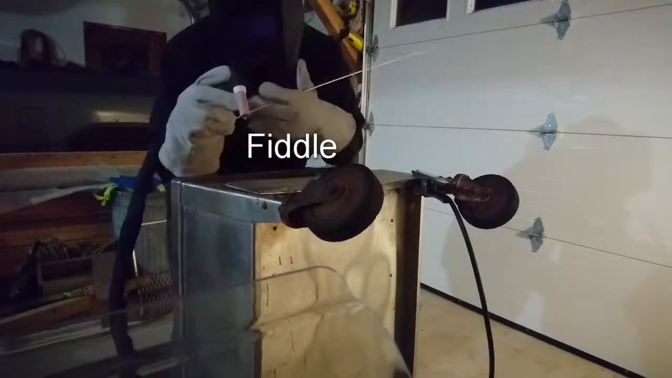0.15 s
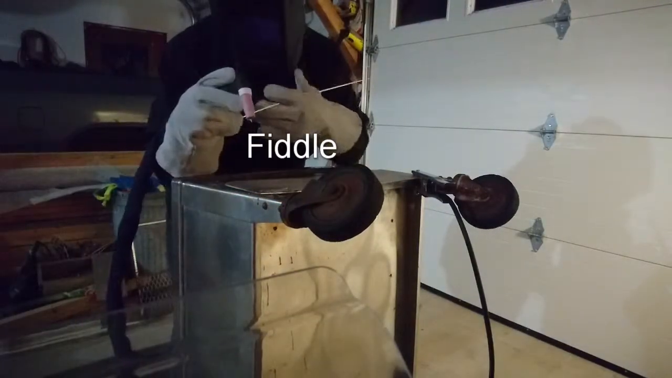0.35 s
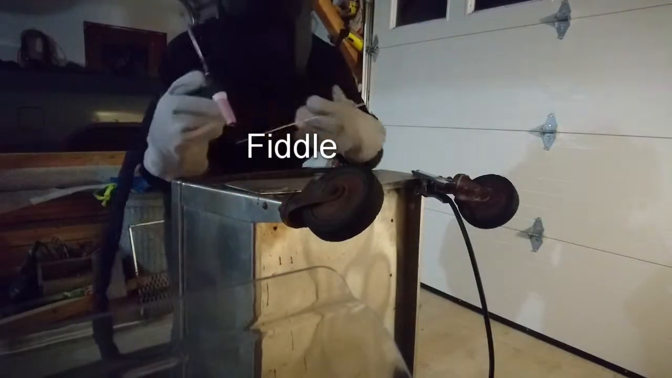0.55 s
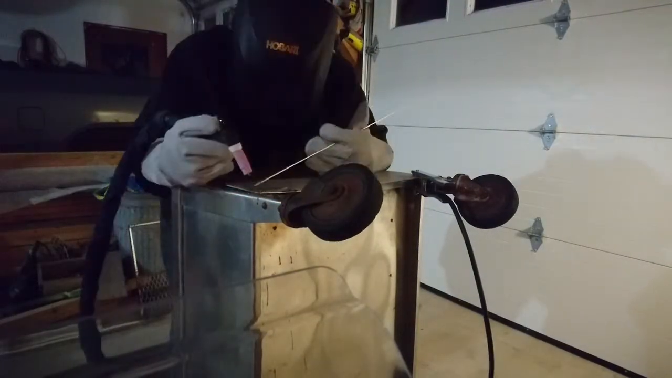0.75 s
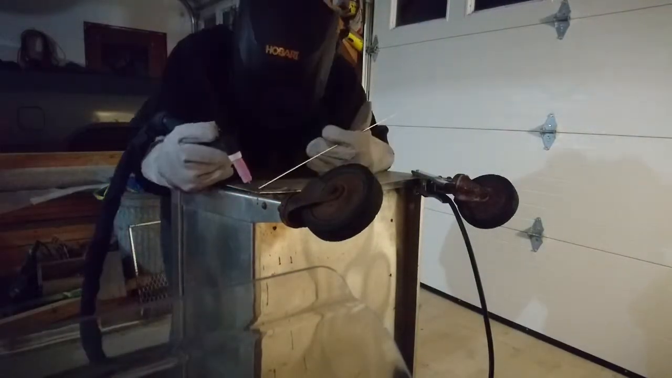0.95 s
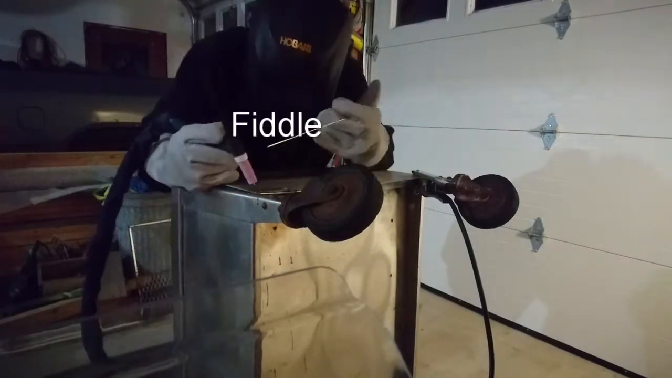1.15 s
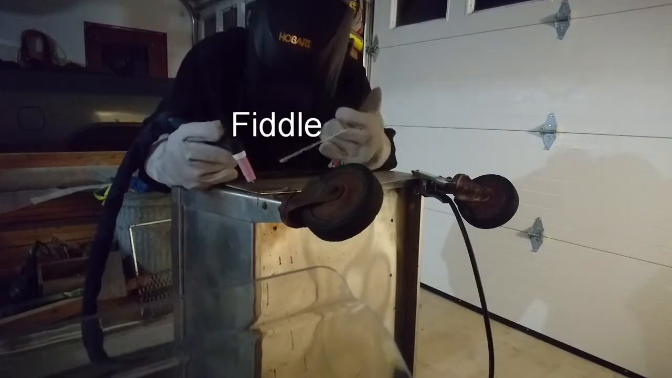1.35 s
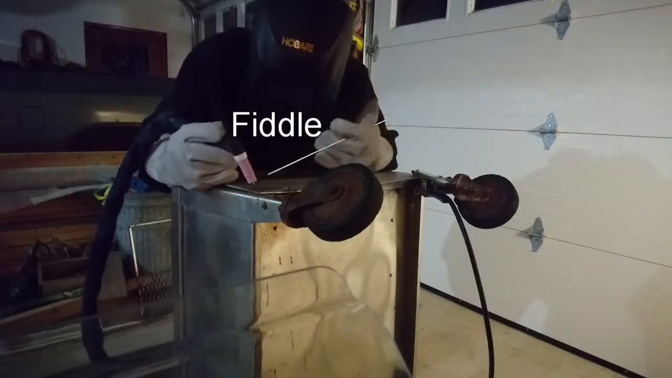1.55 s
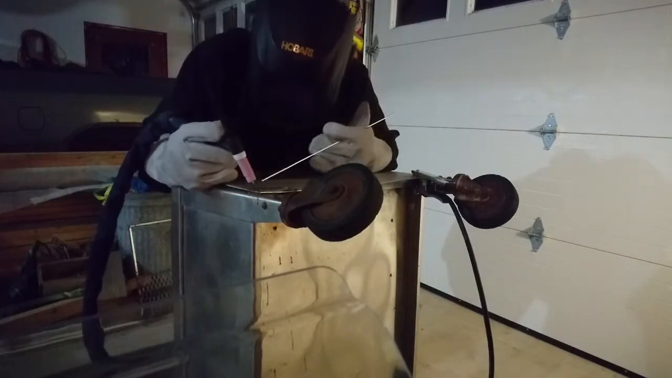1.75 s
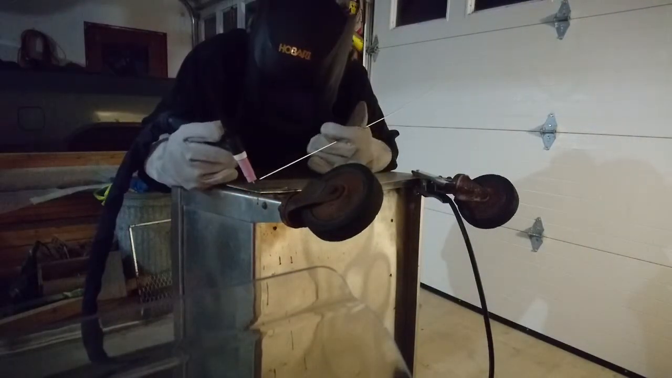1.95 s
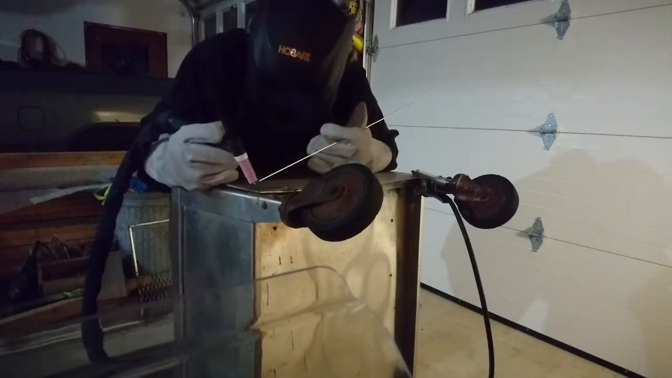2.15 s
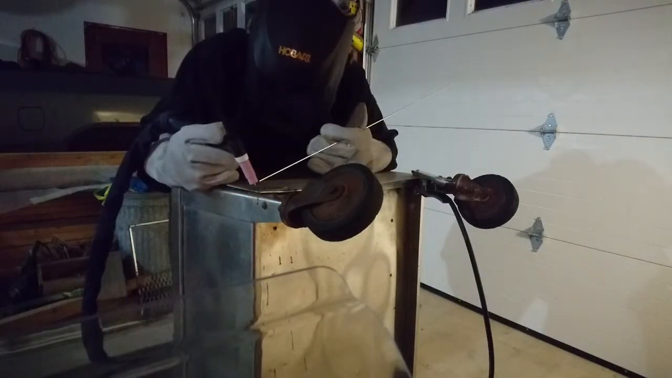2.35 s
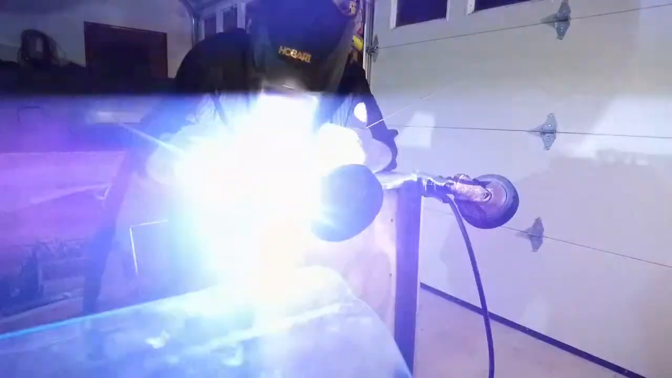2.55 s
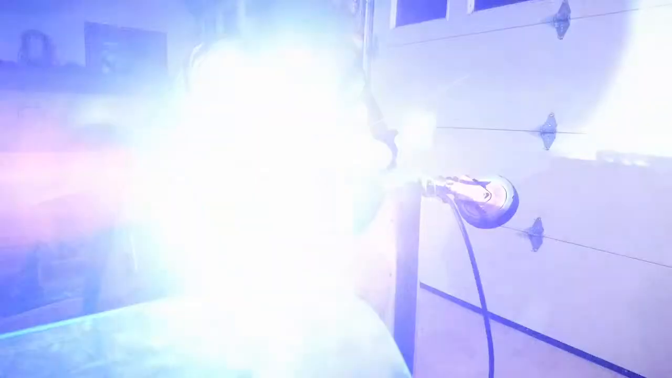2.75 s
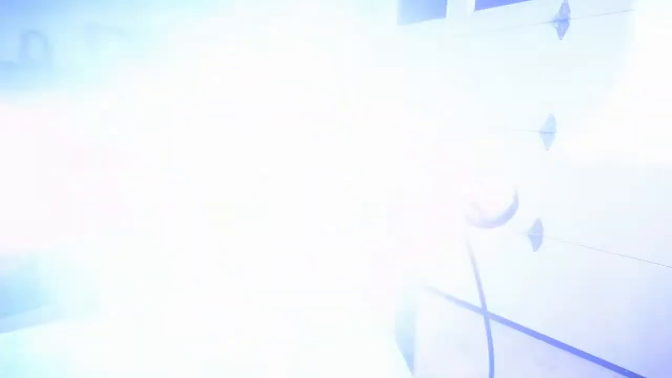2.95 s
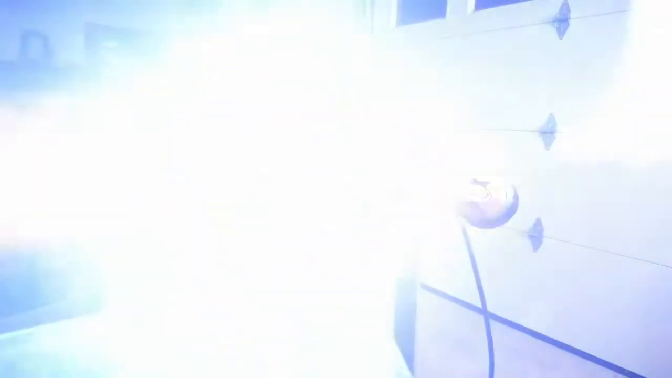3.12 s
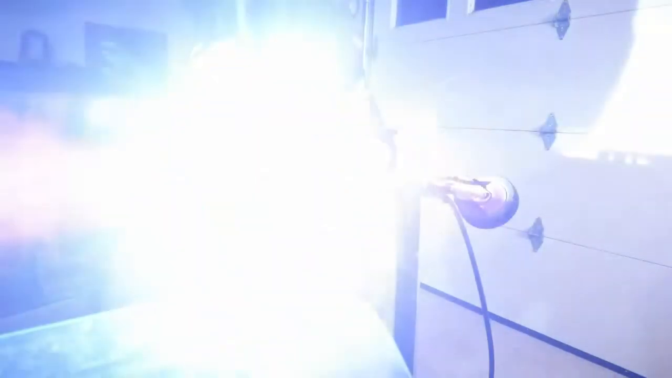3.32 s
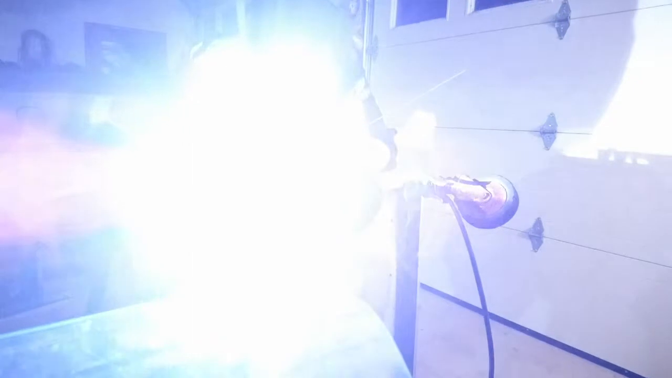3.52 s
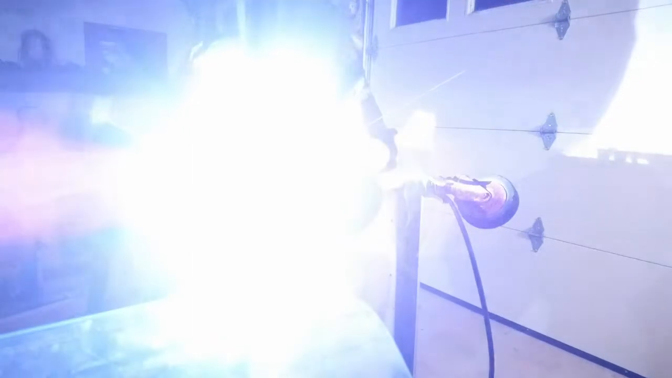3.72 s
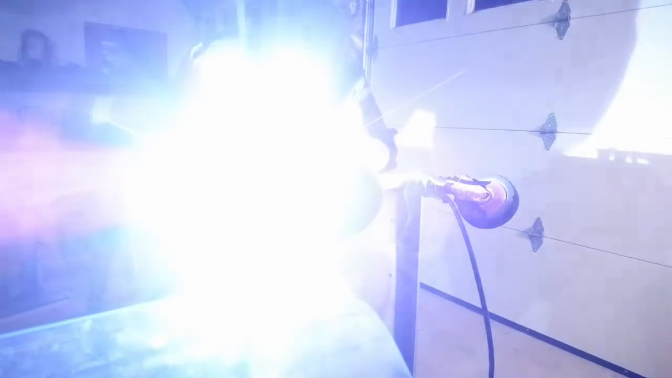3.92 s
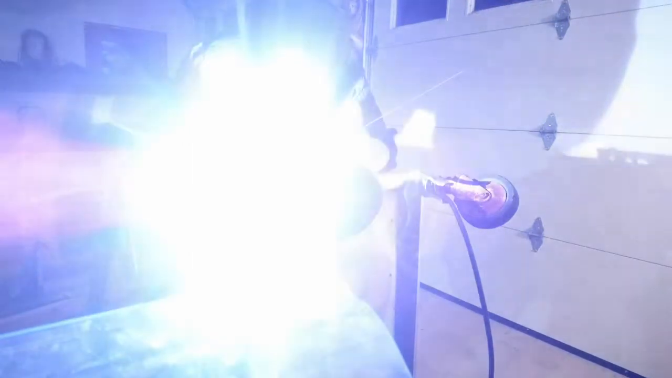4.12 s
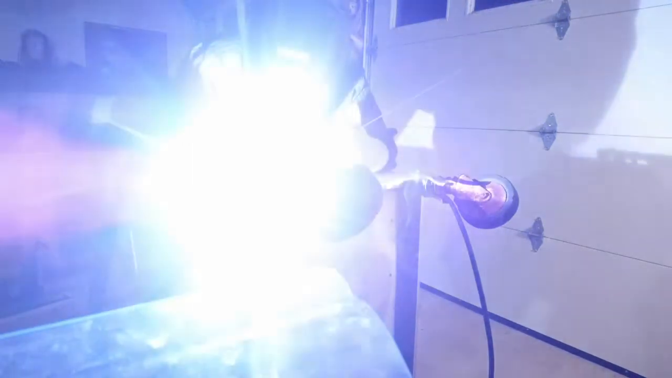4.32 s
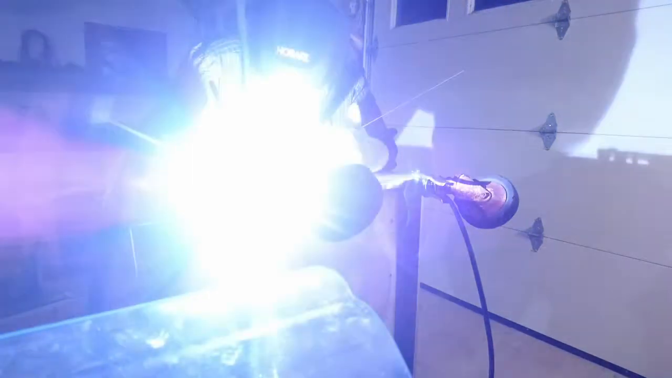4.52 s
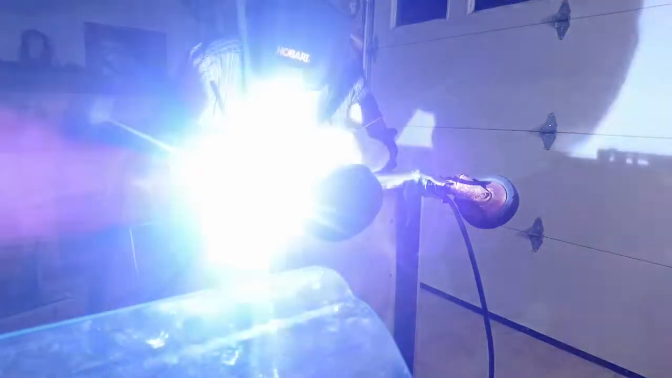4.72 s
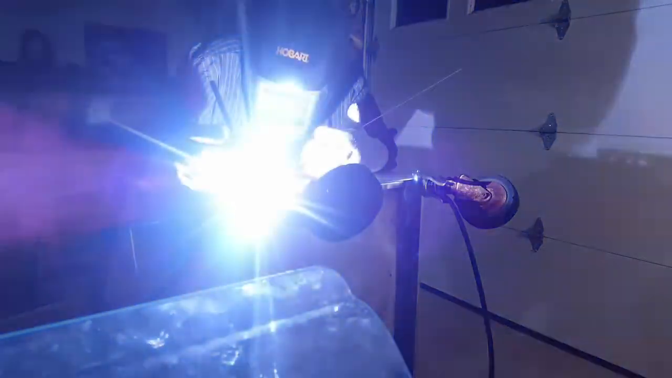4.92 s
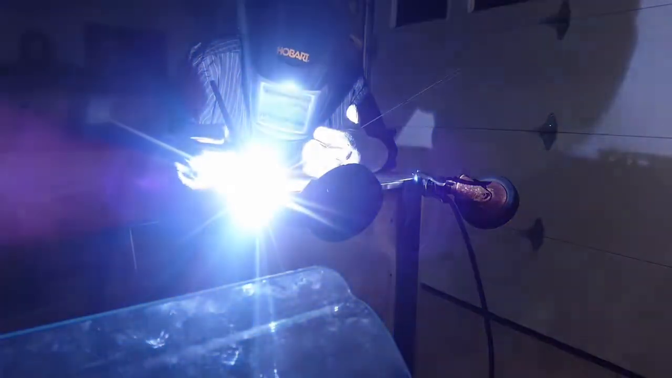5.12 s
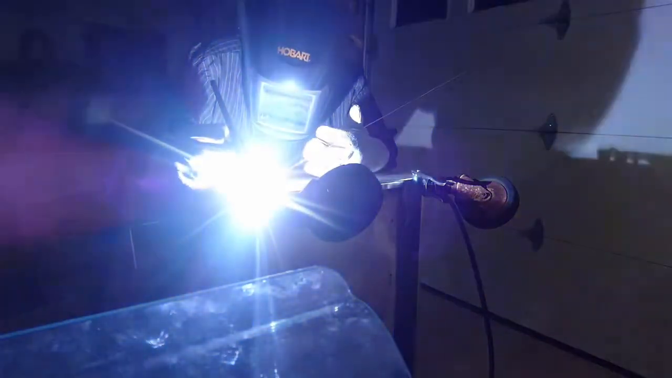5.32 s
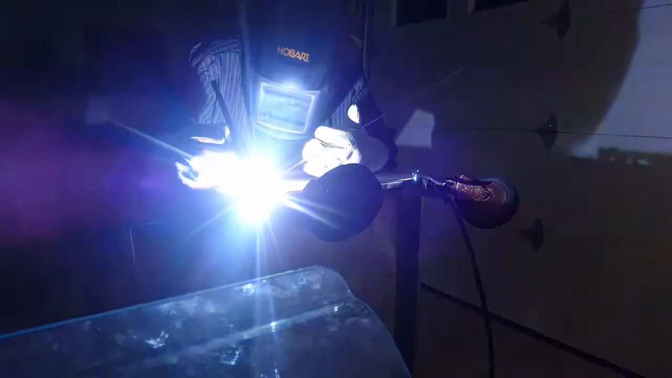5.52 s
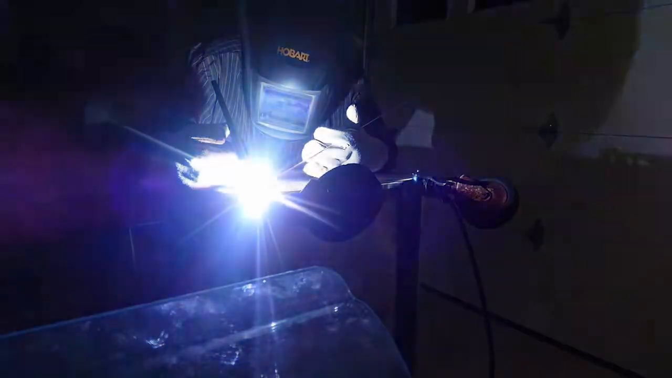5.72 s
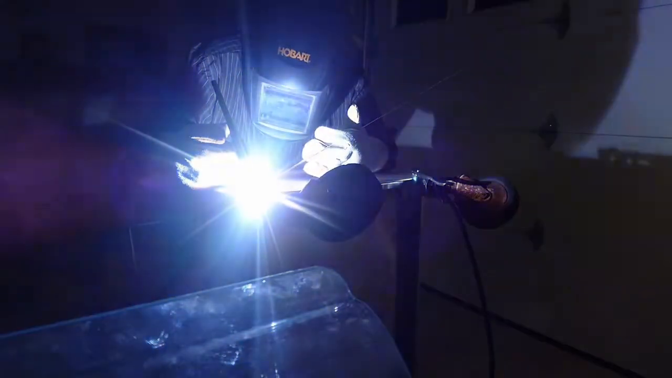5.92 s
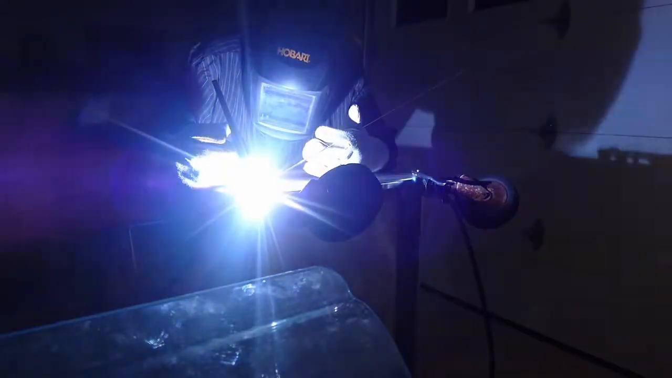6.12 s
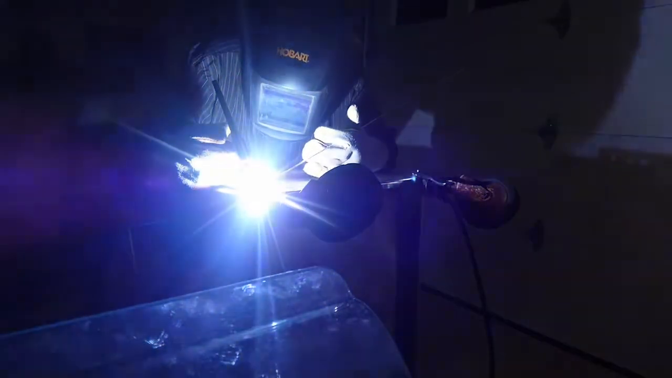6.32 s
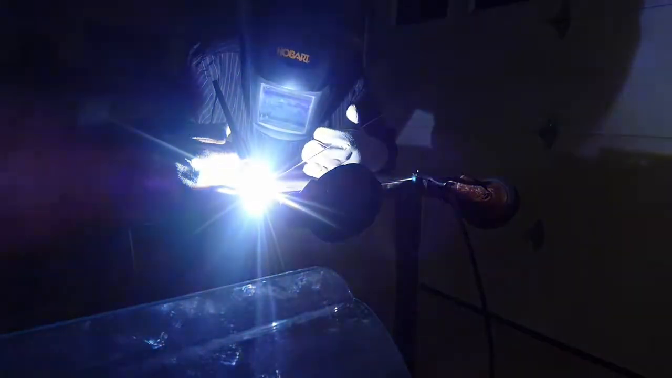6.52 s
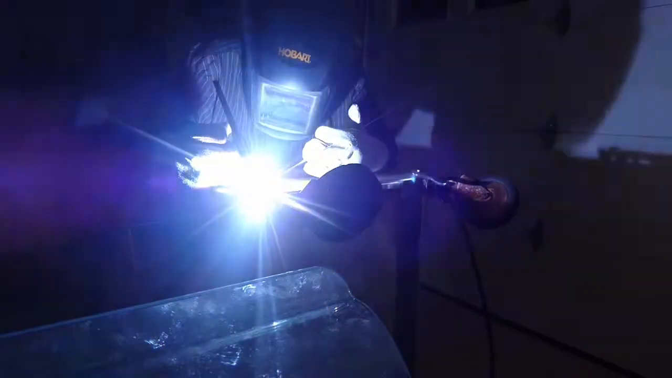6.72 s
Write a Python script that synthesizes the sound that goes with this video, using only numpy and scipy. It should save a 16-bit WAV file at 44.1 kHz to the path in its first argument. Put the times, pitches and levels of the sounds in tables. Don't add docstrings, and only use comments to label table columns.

```python
import sys
import numpy as np
from scipy import signal
from scipy.fft import rfft, irfft, next_fast_len
from scipy.io import wavfile
from scipy.ndimage import map_coordinates

SR = 44100
rng = np.random.default_rng(int(sys.argv[2]) if len(sys.argv) > 2 else 0)


def store_wav(level_fs):
    pcm = np.round(np.clip(np.atleast_2d(level_fs), -1, 1) * 32767)
    wavfile.write(sys.argv[1], SR, pcm.T.astype(np.int16))


def decibels_to_gain(level_db):
    exponent = np.asarray(level_db, float) / 20
    return 10 ** exponent


N = 302526
STRIKE_S = 2.957
LEFT_RIGHT = np.array([[1], [-1]])


def unit(x):
    return x / np.sqrt(np.mean(x ** 2) + 1e-20)


def along(points, hz):
    f, v = np.transpose(points)
    return np.interp(np.log(hz + 1), np.log(f + 1), v)


def wobble(rate):
    knots = rng.standard_normal(int(N * rate / SR) + 4)
    return map_coordinates(knots, [np.arange(N) * rate / SR])


def filtered(x, response):
    m = next_fast_len(N + SR // 2)
    return irfft(rfft(x, m) * response(np.fft.rfftfreq(m, 1 / SR)), m)[..., :N]


def treble_of(x, hz):
    return filtered(x, lambda f: 1 / (1 + (hz / (f + 1)) ** 8))


def mode(f, hz, width):
    return 1j * f * width / (hz * hz - f * f + 1j * f * width)


def body_modes(f, body):
    return sum((-1) ** k * decibels_to_gain(db) * mode(f, hz, width) for k, (hz, width, db) in enumerate(body))


def lean(points, f):
    return decibels_to_gain(along(points, f) / 2 * LEFT_RIGHT)


def pulses(seconds, sizes):
    at = np.asarray(seconds)[:, None] * SR
    taps = np.floor(at).astype(int) + np.arange(-15, 17)
    shape = np.sinc(taps - at) * np.cos(np.pi * (taps - at) / 34) ** 2
    weights = shape * np.asarray(sizes)[:, None]
    return np.bincount(taps.ravel(), weights.ravel(), N + SR)[:N]


def hiss(spectrum, alike):
    a, b = rng.standard_normal((2, N))
    turn = np.arccos(np.clip(alike, 0, 1)) / 2
    pair = np.cos(turn) * a + np.sin(turn) * np.array([b, -b])
    return unit(filtered(pair, lambda f: decibels_to_gain(along(spectrum, f))))


# frequency in Hz, time to fall 60 dB in seconds.
GARAGE_DECAY = [(300, 0.97), (3000, 0.86), (8000, 0.49), (15000, 0.29)]


def garage(x, wet_db):
    hz, t, z = signal.stft(rng.standard_normal((2, SR // 2)), SR, nperseg=256)
    decay = decibels_to_gain(-60 * t / along(GARAGE_DECAY, hz)[:, None])
    tail = signal.istft(z * decay, SR, nperseg=256)[1]
    tail = tail / np.linalg.norm(tail[0])
    return decibels_to_gain(wet_db) * signal.fftconvolve(np.pad(x, (90, 0))[None], tail, axes=1)[:, :N]


# frequency in Hz, level in dB per Hz.
FAN_AIR = [(25, -60), (74, -22.5), (133, -20.5), (203, 0), (300, -15), (414, -5.5), (480, -16.5),
           (625, -22.5), (1280, -32), (2800, -38), (4500, -44), (6300, -52.5), (8500, -68.5), (10500, -76),
           (14000, -80)]
# frequency in Hz, width in Hz, boost in dB.
CASING = [(216, 14, 1), (266.8, 5.2, 13.5), (416, 19, 1), (531.7, 11.7, 7), (831, 25, 8.5),
          (1440, 440, 6.5), (972, 35, 3.5), (1106, 30, 4), (1360, 30, -1), (1906, 110, 5), (2100, 140, 4),
          (4090, 980, 4.5), (2820, 120, 3)]
# frequency in Hz, likeness from 0 to 1.
FAN_ALIKE = [(30, .82), (60, .93), (130, .995), (300, .98), (640, .75), (1400, .6), (4000, .6), (9000, .4)]
# frequency in Hz, left lead in radians.
FAN_LEAD = [(600, 0), (1290, -2.6), (2150, -4.8), (4300, -9.5), (8600, -19)]
# frequency in Hz, left minus right in dB.
FAN_LEAN = [(30, -2), (60, .5), (110, 2), (200, -2), (380, -2.5), (700, -2), (1290, -0.5), (2380, -1.5),
            (4400, -2), (8120, -12.5), (15000, -3.5)]


def fan():
    def at_microphones(f):
        boost_db = sum(db * abs(mode(f, hz, width)) ** 2 for hz, width, db in CASING)
        colour = decibels_to_gain(along(FAN_AIR, f) + boost_db)
        lead = np.exp(.5j * along(FAN_LEAD, f) * LEFT_RIGHT)
        return (f < 14100) * colour * lean(FAN_LEAN, f) * lead

    def shares(f):
        turn = np.arccos(np.clip(along(FAN_ALIKE, f), 0, 1)) / 2
        return np.array([np.cos(turn), np.sin(turn)])

    mid, side = filtered(rng.standard_normal((2, N)), shares)
    air = unit(filtered(np.array([mid + side, mid - side]), at_microphones))
    return air * decibels_to_gain(-23 + .6 * wobble(7))


def knocks(events, body, lift_db, wet_db):
    s, db = np.transpose(events)
    blows = filtered(pulses(s, decibels_to_gain(db + lift_db)), lambda f: body_modes(f, body) / (1 + 1j * f / 2000) ** 3)
    return blows + garage(blows, wet_db)


# start in seconds, peak in dB.
PEDAL = [
    (2.644, -23),
    (2.6648, -8),
    (2.6968, -10.5),
    (2.953, -21),
]
# frequency in Hz, width in Hz, level in dB.
TREAD = [(540, 100, 7), (1270, 240, 6.5), (1490, 630, -11), (2910, 74, 14)]


def pedal():
    t = np.arange(N) / SR
    bounces = [(s + .0083, db - 3) for s, db in PEDAL]
    rub = np.zeros(N)
    for s, db in PEDAL:
        fall_db = 60 * np.abs(t - s) / 0.14
        rub += np.clip((t - s) / 0.0036, 0, 1) * decibels_to_gain(db - 19 - fall_db)
    grit = hiss([(400, -27.0), (600, 13), (1400, -21.0), (2000, -20.0)], alike=0.29)
    scrape = rub * decibels_to_gain(1.5 * wobble(60)) * grit
    return scrape + knocks(PEDAL + bounces, TREAD, lift_db=21, wet_db=-0.5)


# start in seconds, peak in dB.
VALVE = [
    (2.5759, -6),
    (2.595, -22),
    (2.618, -16),
    (2.63, -22),
    (2.673, -22),
    (2.7045, -20),
    (2.722, -25),
]
# frequency in Hz, width in Hz, level in dB.
LATCH = [(2010, 570, 9), (3230, 540, 8), (5750, 710, 10), (8200, 1100, -11)]


def valve():
    t = np.arange(N) / SR
    rattle = np.zeros(N)
    for s, db in VALVE:
        fall_db = 60 * np.abs(t - s) / 0.032
        rattle += decibels_to_gain(db - 7.5 - fall_db) * np.clip((t - s) / 0.0017, 0, 1)
    body = unit(filtered(rng.standard_normal((2, N)), lambda f: body_modes(f, LATCH)))
    return rattle * decibels_to_gain([[-2.5], [2.5]]) * body


SURGE_S = 2.698


def flow(spit_db, surge_db, swell_db, sag_db, steady_db):
    t = np.arange(N) / SR
    since = t - VALVE[0][0]
    spit = decibels_to_gain(spit_db - 60 * np.abs(since) / 0.11)
    loss_db = np.where(t < SURGE_S, swell_db * (SURGE_S - t), sag_db * (t - SURGE_S))
    return (since > 0) * (spit + decibels_to_gain(surge_db - loss_db) + decibels_to_gain(steady_db))


# frequency in Hz, level in dB per Hz.
JET = [(500, -28), (800, -12), (1200, -12), (1480, -8), (2380, -16.5), (2810, -9), (4250, -11.5),
       (5710, -13.5), (9000, -27), (11700, -41), (19800, -120)]
# frequency in Hz, level in dB per Hz.
FIZZ = [(4120, -32), (7000, 2), (9860, -10), (12700, -4), (14000, -7), (15100, -4), (16000, -16)]
# frequency in Hz, width in Hz, boost in dB.
NOZZLE = [(3000, 200, -3), (3580, 250, 2), (5660, 300, 3)]
# spit in dB, surge in dB, swell in dB per second, sag in dB per second, steady flow in dB.
JET_FLOW = (-22.5, -29, 18, 62, -46)
# spit in dB, surge in dB, swell in dB per second, sag in dB per second, steady flow in dB.
FIZZ_FLOW = (-51, -43.5, 140, 152, -56.5)


def gas():
    def cup(f):
        return decibels_to_gain(sum(db * abs(mode(f, hz, w)) ** 2 for hz, w, db in NOZZLE) - 3.5)

    t = np.arange(N) / SR
    sputter = decibels_to_gain(2 * wobble(260) + .6 * wobble(30))
    jet = filtered(hiss(JET, alike=0.062), cup)
    darkening = decibels_to_gain(-56 * np.clip(t - SURGE_S, 0, None))
    jet = jet + (darkening - 1) * treble_of(jet, 4300)
    return sputter * (flow(*JET_FLOW) * jet + flow(*FIZZ_FLOW) * hiss(FIZZ, alike=0.18))


# delay in ms, left size, right size.
NEAR_PATHS = [(0.04, -0.92, -0.0), (0.11, 0.84, -0.4), (0.16, 0.67, -0.31), (0.21, -0.42, -0.43),
              (0.26, -0.28, 0.59), (0.43, -0.54, 0.02), (0.61, -0.53, -0.32), (0.79, 0.17, 0.06),
              (0.87, -0.46, -0.09), (0.92, 0.91, 0.02), (1.01, 0.67, -0.08), (1.12, -0.28, 0.36),
              (1.18, -0.58, 0.09), (1.26, 0.32, -0.14), (1.38, -0.45, 0.02), (1.46, 0.25, -0.41),
              (1.51, -0.11, -0.29), (1.75, 0.42, 0.1), (1.98, -0.22, -0.16), (2.08, 0.3, -0.08),
              (2.26, 0.34, -0.08), (2.34, -0.01, -0.29), (2.96, -0.2, -0.27), (3.08, -0.28, -0.25),
              (3.7, 0.3, -0.3), (4.27, -0.25, -0.03), (4.39, 0.08, -0.29), (4.55, 0.23, -0.11),
              (4.68, 0.08, 0.26), (5.0, -0.21, -0.22), (5.18, 0.04, -0.28), (6.03, 0.05, 0.58),
              (6.21, -0.07, 0.61), (6.42, 0.1, -0.2), (6.55, -0.23, -0.38), (6.62, -0.16, -0.28),
              (7.06, 0.23, -0.28), (7.15, 0.29, -0.2), (7.2, 0.03, -0.57), (7.25, 0.08, -0.61),
              (7.3, 0.2, -0.19), (7.43, -0.3, -0.5), (8.13, -0.59, 0.67), (8.18, 0.46, 1.0),
              (8.29, -0.28, 0.08), (8.34, -0.45, 0.13), (8.4, -0.09, 0.48), (8.52, 0.08, 0.66),
              (8.73, 0.31, 0.23), (8.82, 0.23, 0.28)]
# delay in ms, left size, right size.
FAR_PATHS = [(8.87, -0.31, 0.39), (9.08, 0.16, -0.29), (9.13, 0.04, 0.77), (9.23, -0.14, 0.53),
             (9.42, -0.45, -0.04), (9.5, 0.17, 0.61), (9.56, -0.11, 0.24), (9.7, 0.15, 0.72),
             (9.75, -0.33, 0.37), (9.81, 0.05, 0.37), (9.89, -0.11, 0.37), (10.0, -0.18, -0.2),
             (10.2, 0.03, 0.55), (10.54, -0.22, -0.37), (10.67, -0.2, -0.15), (10.95, -0.09, -0.44),
             (11.15, 0.26, -0.2), (11.41, -0.22, -0.43), (11.47, 0.21, -0.15), (11.62, -0.05, -0.27),
             (11.82, -0.24, 0.28), (12.36, 0.12, 0.25), (13.37, -0.29, -0.05), (13.45, 0.01, 0.33),
             (13.77, -0.01, 0.54), (13.99, 0.01, -0.39), (14.05, 0.33, -0.13), (14.11, 0.3, 0.44),
             (14.5, 0.28, -0.1), (14.79, 0.12, 0.32), (14.84, 0.46, -0.05), (15.09, 0.51, 0.1),
             (15.36, -0.27, -0.19), (15.82, -0.36, -0.03), (16.17, -0.05, -0.31), (16.23, 0.34, 0.2),
             (16.76, -0.01, -0.35), (17.13, -0.05, 0.22), (17.74, 0.08, -0.41), (17.98, -0.09, 0.24),
             (18.19, -0.01, -0.28), (18.47, 0.19, -0.19), (18.57, -0.24, -0.02), (18.7, -0.24, -0.2),
             (18.89, 0.16, -0.29), (19.04, 0.0, -0.3), (19.13, -0.07, 0.22), (19.76, -0.09, 0.24),
             (20.65, -0.48, -0.02), (20.7, -0.22, -0.39)]


def paths(hz):
    ms, *sides = np.transpose(NEAR_PATHS + FAR_PATHS)
    return (np.array(sides) @ np.exp(-2j * np.pi * hz * ms / 1000))[:, None]


def echoed(x):
    ms, *sides = np.transpose(NEAR_PATHS + FAR_PATHS)
    answer = np.array([pulses(ms / 1000 + 32 / SR, side)[:1200] for side in sides])
    return signal.fftconvolve(x[None], answer, axes=1)[:, 32:N + 32]


CYCLE_HZ = 48.2555
# time into the cycle in ms, size, scatter in microseconds.
FLIPS = [
    (12.11, .85, 3),
    (18.0, 1, 2),
]
# middle in seconds, half length in seconds.
STUTTER = [
    (4.14, 0.035),
    (4.405, 0.061),
    (4.455, 0.02),
]
# time in seconds, added lateness in ms, duration in seconds.
SLIPS = [
    (4.14, .26, .05),
    (4.405, .55, .04),
    (4.435, .16, .04),
    (4.46, .36, .03),
]
# time in seconds, lateness in ms.
CREEP = [(2.96, -1.36), (3.6, -1.469), (4.12, -1.473), (4.35, -1.449), (4.5, -1.459), (5.27, -1.409),
         (6.25, -1.5), (6.86, -1.54)]


def reversals():
    cycle = np.arange(int(STRIKE_S * CYCLE_HZ), int(N / SR * CYCLE_HZ)) / CYCLE_HZ
    slipped = sum(ms * np.clip((cycle + .5 / CYCLE_HZ - s) / over + .5, 0, 1) for s, ms, over in SLIPS)
    cycle = cycle + (np.interp(cycle, *np.transpose(CREEP)) + slipped) / 1000
    shaky = sum(np.exp(-((cycle - s) / half) ** 4) for s, half in STUTTER)
    lit = np.arange(N) / SR > STRIKE_S
    trains = []
    for ms, size, scatter in FLIPS:
        late, louder = rng.standard_normal((2, len(cycle)))
        at = cycle + ms / 1000 + late * (scatter + 150 * shaky) * 1e-6
        trains.append(pulses(at, size * decibels_to_gain(.25 * louder)) * lit)
    return trains


# frequency in Hz, left level in dB,
# right level in dB.
METAL_MODES = [(1158, -46, -53), (1351, -50, -43), (1399, -50, -42), (1496, -49, -50), (1544, -48, -46),
               (1689, -51, -46), (1834, -48, -47), (1882, -50, -45), (1978, -58, -46), (2027, -44, -46),
               (2220, -46, -44), (2365, -48, -57), (2509, -43, -51), (2558, -45, -51), (2606, -52, -47),
               (2751, -45, -57), (2123, -58, -50), (3667, -56, -47), (3909, -56, -49), (5694, -51, -49),
               (2847, -55, -38), (3040, -47, -39), (3088, -49, -45), (3185, -47, -45), (3233, -63, -42),
       (3330, -45, -55), (3378, -43, -44), (3523, -44, -50), (3571, -46, -45), (3619, -43, -53),
       (3716, -41, -45), (4198, -47, -53), (4391, -46, -48), (4440, -50, -45), (4536, -50, -39),
       (4584, -42, -41), (4681, -56, -45), (4729, -49, -49), (4922, -49, -48), (5067, -49, -46),
       (5260, -47, -45), (5405, -59, -45), (5453, -45, -51), (5549, -53, -47), (5742, -50, -49),
       (5935, -61, -36), (6080, -46, -44), (6128, -56, -42), (6225, -58, -42), (6466, -65, -46),
               (820, -56, -49), (869, -55, -55), (917, -67, -64), (965, -54, -50), (1062, -52, -57),
       (1255, -51, -51), (1303, -51, -51), (1592, -51, -54), (1641, -51, -52), (1737, -57, -58),
       (1930, -49, -51), (2075, -52, -49), (2171, -55, -52), (2268, -49, -60), (2413, -57, -54),
       (2654, -56, -53), (2799, -51, -48), (2895, -54, -56), (2992, -50, -48), (3137, -55, -60),
       (3281, -52, -51), (3474, -56, -52), (3957, -51, -53), (4295, -52, -57), (4343, -52, -54),
       (4826, -59, -61), (5019, -53, -56), (5115, -52, -50), (5212, -49, -53), (5791, -71, -54),
       (5839, -82, -73), (5887, -57, -50), (5984, -55, -58), (6273, -52, -52), (6321, -59, -73),
       (6370, -74, -63),
               (6562, -83, -49), (6611, -53, -51), (6804, -56, -53), (6900, -87, -51), (6948, -60, -47),
       (6997, -59, -59), (7141, -59, -52), (7286, -60, -54), (7334, -60, -57), (7431, -58, -49),
       (7479, -64, -50), (7624, -58, -57), (7817, -56, -51), (7962, -57, -64), (8010, -82, -50),
       (8155, -73, -51), (8299, -68, -52), (8348, -85, -51), (8637, -60, -53), (8685, -56, -71),
       (8830, -63, -51), (8975, -60, -70), (9023, -84, -51), (9120, -62, -59), (9168, -78, -51),
       (9216, -61, -58), (9313, -66, -52), (9361, -63, -55), (9458, -64, -52), (9506, -58, -62),
       (9651, -65, -56), (9699, -60, -56), (9844, -67, -54), (10037, -76, -53), (10181, -62, -54),
       (10230, -91, -56), (10374, -76, -57), (10519, -59, -70), (10664, -63, -76), (10760, -61, -60),
       (10857, -62, -58), (10905, -58, -62), (11002, -66, -54), (11050, -58, -58), (11195, -63, -59),
       (11243, -70, -53), (11726, -69, -58), (11774, -77, -59), (11870, -58, -58), (11919, -59, -61),
       (12015, -64, -64), (12063, -61, -58), (12112, -64, -62), (12256, -59, -56), (12594, -58, -56),
       (12739, -55, -65), (12884, -60, -57), (12932, -62, -66), (13077, -61, -58), (13270, -57, -68)]


def metal(f):
    taken, given = np.zeros(len(f), complex), np.zeros((2, len(f)), complex)
    for hz, left_db, right_db in METAL_MODES:
        hz = round(hz / CYCLE_HZ) * CYCLE_HZ
        level_db = np.array([[left_db], [right_db]])
        near = slice(*np.searchsorted(f, [hz - 250, hz + 250]))
        both = sum(size * np.exp(-2j * np.pi * hz * (ms - FLIPS[1][0]) / 1000) for ms, size, _ in FLIPS)
        step = np.exp(1j * np.angle(-1j * both * paths(hz)))
        weak_db = np.clip(-45 - level_db, 0, 12)
        step = step * np.exp(1j * .03 * weak_db * rng.standard_normal((2, 1)))
        swell = mode(f[near], hz, 18) ** 2
        taken[near] += swell
        given[:, near] += decibels_to_gain(level_db) * step * swell
    return taken, given


# frequency in Hz, level in dB per Hz.
SNAP = [(600, -21.5), (1000, -1.5), (1400, -6), (2400, -6), (3200, -1), (4200, -7.5), (5000, -4),
        (6100, -12), (7000, -8), (9000, -15), (10500, -16), (13000, -6), (15300, -7), (15800, -17)]


def snaps(trains, drive):
    def clear(f):
        return 1 / (1 + (f / 13500) ** 8)

    since = np.arange(N) / SR - STRIKE_S
    snap = unit(filtered(sum(trains), lambda f: -1j * decibels_to_gain(along(SNAP, f)))) * drive
    snap = snap * (1 + 0.37 * decibels_to_gain(-60 * np.abs(since) / 0.029))
    direct = decibels_to_gain(-41.5) * filtered(echoed(snap), clear)
    scattered = filtered(snap, lambda f: decibels_to_gain(8 * (1 - clear(f))))
    buzz = direct + garage(scattered, wet_db=-43.5)
    return filtered(buzz, lambda f: 1 - metal(f)[0])


# frequency in Hz, level in dB per Hz.
PLASMA = [(600, -30), (1000, -7), (2400, -5), (3200, -3.5), (4500, -4), (5200, -6.5), (6200, -7),
          (7200, -13), (10500, -18.5), (13000, -21.5), (15500, -20)]
# frequency in Hz, left minus right in dB.
HISS_LEAN = [(1000, 4.5), (4000, -0.5), (6000, 5), (9000, -11.5), (12000, 4.5)]


def plasma(drive, hiss_db):
    since = np.arange(N) / SR - STRIKE_S
    gain = np.clip(since / 0.033, 0, 1) * np.sqrt(drive) * decibels_to_gain(hiss_db + 1.1 * wobble(28))
    return filtered(gain * hiss(PLASMA, alike=0.11), lambda f: lean(HISS_LEAN, f))


# frequency in Hz, level in dB per Hz.
FLARE = [(500, -32), (800, 4), (1200, -3), (1800, -24), (4000, -50)]


def flare():
    since = np.arange(N) / SR - STRIKE_S
    gain = (since > 0) * decibels_to_gain(-43 - 60 * np.abs(since) / 2.7 + 2.2 * wobble(120))
    return gain * hiss(FLARE, alike=.3)


# time in seconds, level in dB.
CURRENT = [(2.96, -27), (3.05, -28), (3.45, -33), (4.4, -31), (6.86, -30.5)]
# frequency in Hz, left minus right in dB.
ARC_LEAN = [(1000, -5.5), (4500, 2.5), (6000, -7), (8400, 0), (10500, -4), (15000, 0.5)]
# frequency in Hz, width in Hz, depth from 0 to 1.
SHADOW = [(13620, 500, .9), (13780, 500, .9), (13930, 400, .9)]
# start in seconds, peak in dB.
POP = [
    (2.9592, -19),
]
# frequency in Hz, width in Hz, level in dB.
POP_BODY = [(636, 300, -3), (1280, 180, 12.5), (2000, 870, 10), (4500, 1400, 17)]


def arc():
    def past_cup(f):
        shadow = np.prod([1 - depth * mode(f, hz, w) for hz, w, depth in SHADOW], axis=0)
        return lean(ARC_LEAN, f) * shadow

    t = np.arange(N) / SR
    buzz_db = np.interp(t, *np.transpose(CURRENT))
    over_steady_db = buzz_db + 31
    drive = decibels_to_gain(buzz_db + 30)
    trains = reversals()
    hot = plasma(drive, hiss_db=-35 + 0.39 * over_steady_db)
    body = filtered(snaps(trains, drive) + hot, past_cup)
    cold_db = -5 * np.clip(1.3 - (t - STRIKE_S) / 1.1, 0, 1)
    body = body + (decibels_to_gain(cold_db) - 1) * treble_of(body, 11000)
    treble_db = 3 - 1.05 * np.clip(over_steady_db, 0, None)
    body = body + (decibels_to_gain(treble_db) - 1) * treble_of(body, 7500)
    ring = filtered(trains[1] * decibels_to_gain(over_steady_db), lambda f: metal(f)[1])
    ring = SR / CYCLE_HZ / np.sqrt(2) * ring
    return body + ring + flare() + knocks(POP, POP_BODY, lift_db=27.5, wet_db=6.5)


def scene():
    return fan() + pedal() + valve() + gas() + arc()


def low_pass(x):
    return signal.sosfilt(signal.butter(12, 16680, fs=SR, output="sos"), x)


# frequency in Hz, width in Hz, left depth, right depth from 0 to 1.
PORTS = [(8350, 900, .85, 0), (6800, 300, .25, 0), (12450, 300, .5, .5), (11500, 400, .5, .4)]
LEVEL_DIPS = [
    0.7745,
    1.1745,
    1.809,
]


def record(dry):
    def microphone(f):
        band = np.sin(np.pi / 2 * np.clip((15800 - f) / 150, 0, 1)) ** 2
        notches = [1 - np.array([[left], [right]]) * mode(f, hz, w) for hz, w, left, right in PORTS]
        return band * np.prod(notches, axis=0)

    t = np.arange(N) / SR
    dips = np.prod([np.clip(abs(t - s) / 0.014, .12, 1) ** 0.75 for s in LEVEL_DIPS], axis=0)
    return low_pass(filtered(dry, microphone) * dips)


dry = scene()
out = record(dry)
store_wav(out)
```